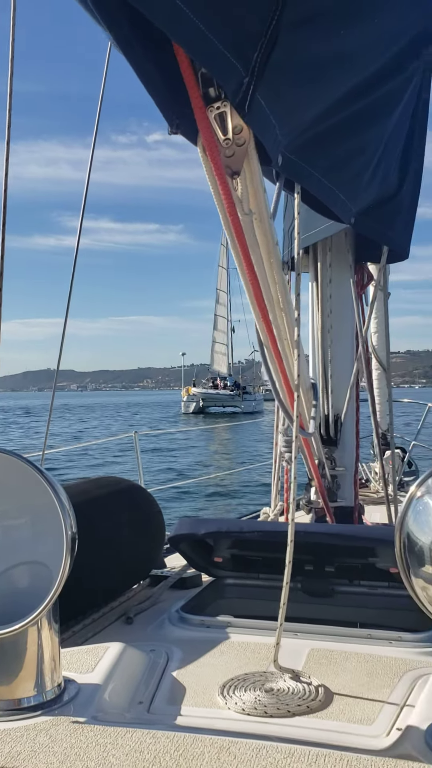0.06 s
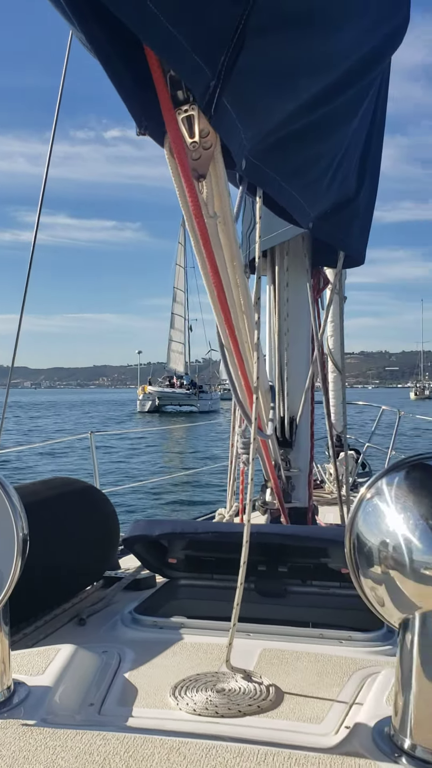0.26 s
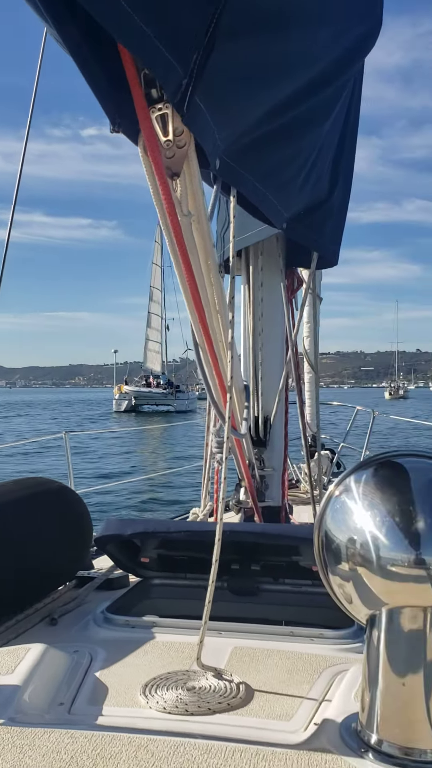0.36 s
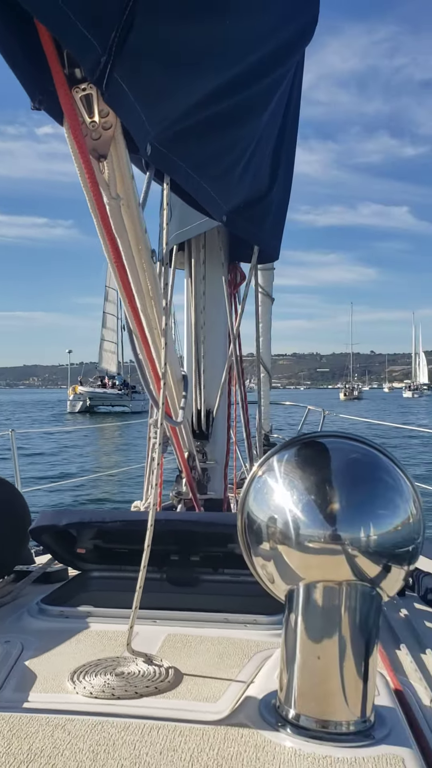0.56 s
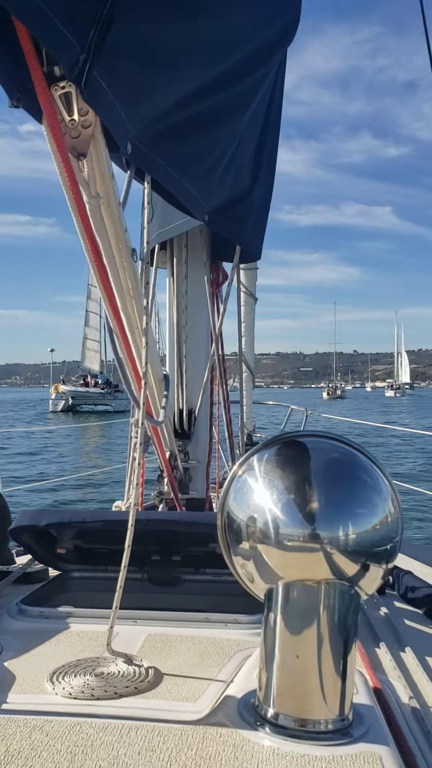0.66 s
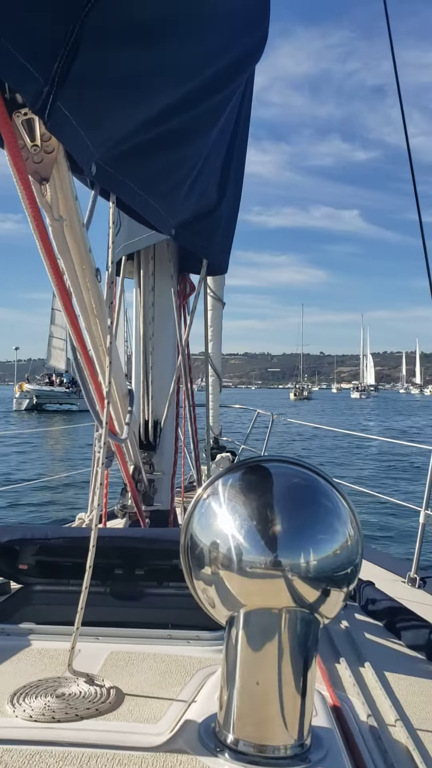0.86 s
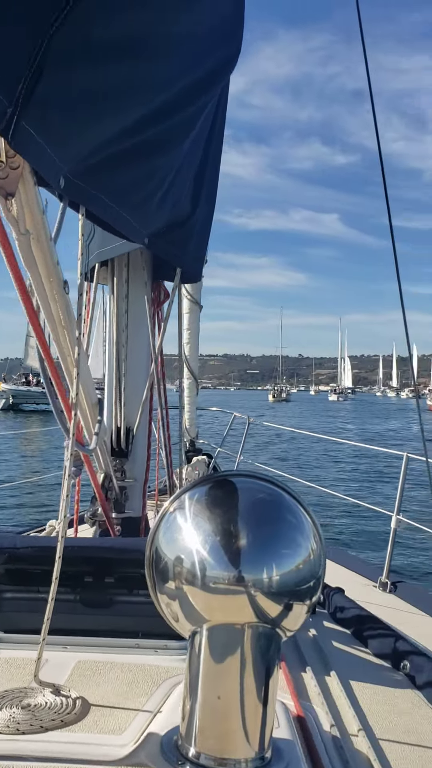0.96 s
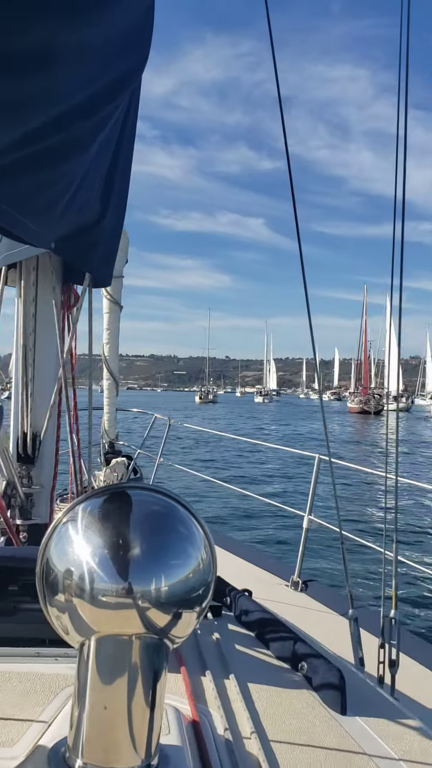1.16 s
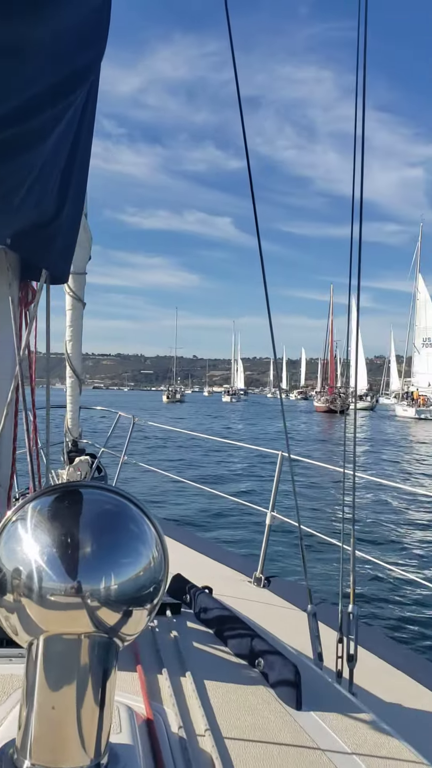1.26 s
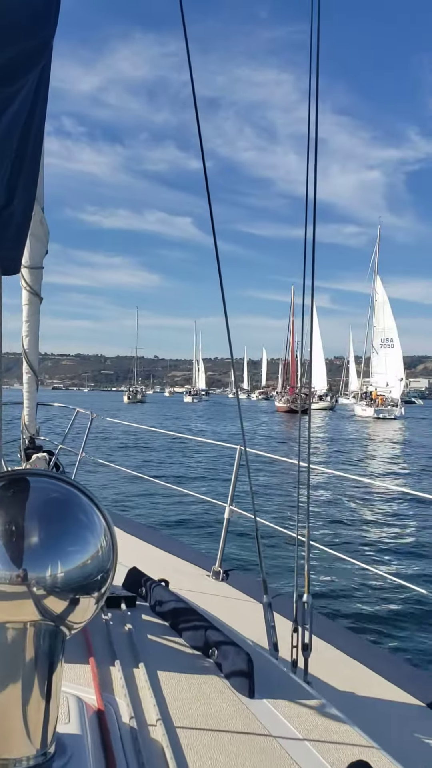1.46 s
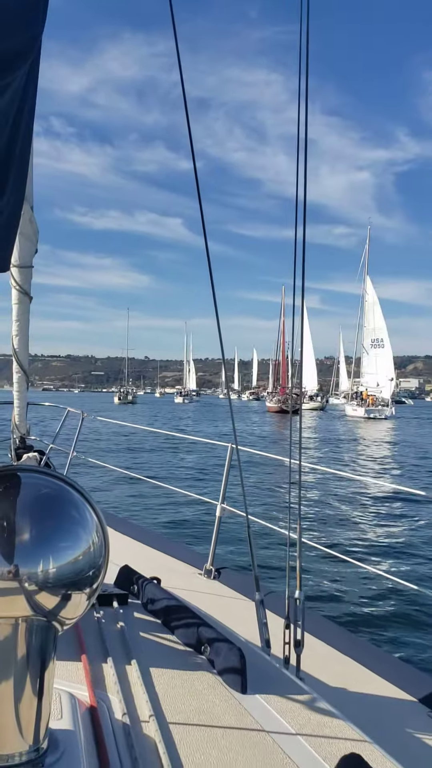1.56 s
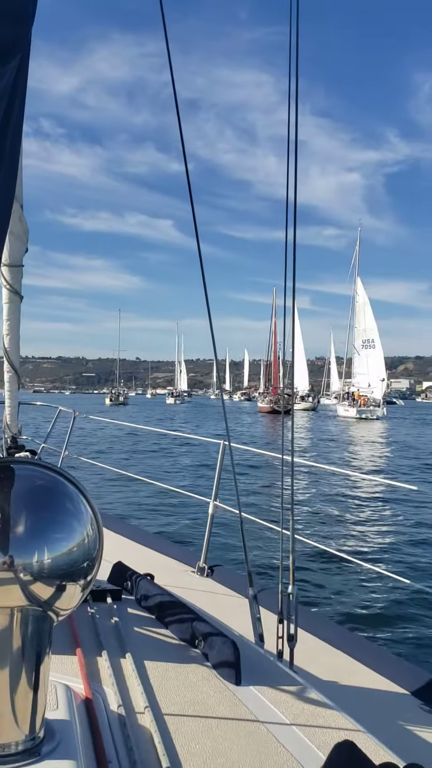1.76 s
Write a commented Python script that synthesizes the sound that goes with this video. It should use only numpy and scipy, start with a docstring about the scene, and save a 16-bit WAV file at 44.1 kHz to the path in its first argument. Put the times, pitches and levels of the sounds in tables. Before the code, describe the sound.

A close air horn swells into a single half-second blast and cuts off, leaving faint distant echoes. Around the microphone in the sailboat's cockpit, a slow engine, wind and water rumble, with a thin rising whine.

```python
"""Cockpit of a sailboat motoring across a bay, stereo microphone: one blast of an air horn close by.
The horn arrives directly and off the deck; as the microphone turns, those paths shift and its
overtones swell and fade. Faint echoes return from far off. Underneath: a slow engine with throbbing
hiss, water on the hull, a thin rising whine, two tiny squeaks. The blast pulls the gain control
down, and it only creeps back."""
import sys
import numpy as np
from scipy import signal
from scipy.io import wavfile
from scipy.ndimage import map_coordinates

SR = 44100
rng = np.random.default_rng(int(sys.argv[2]) if len(sys.argv) > 2 else 0)


def unload_audio(sound):
    """Save the sound as a 16-bit wav file, at the path given as the first command line argument."""
    columns = np.transpose(np.atleast_2d(sound))
    # keep every value between -1 and 1, then stretch to whole-number steps
    steps = np.round(np.clip(columns, -1, 1) * 32767)
    wavfile.write(sys.argv[1], SR, steps.astype(np.int16))


N = 79380
T = np.arange(N) / SR
EARS = np.array([[1], [-1]])   # left up, right down
HORN_DB, VALVE_SHUTS_S = 14.5, .649

# air behind the horn's diaphragm: t/s, level/dB re full blow
BLOW = [(.197, -58), (.213, -29), (.228, -12), (.24, -8.5), (.268, -8.5), (.303, -2.5), (.35, -.8),
        (.41, 0), (.5, -.5), (.645, -1.8)]


def from_db(db):
    """Decibels to gain."""
    return 10 ** (np.asarray(db) / 20)


def rms_one(x):
    """Scale to rms 1."""
    return x / np.sqrt(np.mean(x ** 2) + 1e-20)


def in_time(rows):
    """The columns of a curve, sample by sample."""
    s, *columns = np.transpose(rows)
    return [np.interp(T, s, c) for c in columns]


def at_hz(points, hz):
    """Read a table on a log-frequency axis."""
    freqs, values = np.transpose(points)
    return np.interp(np.log(hz), np.log(freqs), values)


def smooth(x, seconds):
    """One-pole lag."""
    r = np.exp(-1 / (seconds * SR))
    return signal.lfilter([1 - r], [1, -r], x)


def phase_of(hz):
    """Running phase of a pitch curve."""
    return 2 * np.pi * np.cumsum(hz) / SR


def delayed(x, ms):
    """Read a sound late by a steady or sliding delay."""
    return map_coordinates(x, [(T - ms / 1000) * SR], order=3)


def drift(rate_hz):
    """Random wander of rms about 1, mostly slower than rate_hz."""
    step, settle = 40, 2000
    r = np.exp(-2 * np.pi * step * rate_hz / SR)
    white = rng.standard_normal(N // step + settle + 2)
    slow = signal.lfilter([1], [1, -2 * r, r * r], white)[settle:]
    return np.interp(np.arange(N) / step, np.arange(len(slow)), rms_one(slow))


def banded_noise(spectrum, flicker_db):
    """Stereo noise of rms 1 in half-octave bands, each with its own flicker, width and balance."""
    # likeness of the two channels: f/Hz, correlation
    likeness = [(180, .99), (550, .82), (1650, .35), (5000, .1)]
    # lean to the left: f/Hz, left minus right/dB
    balance = [(400, 1.7), (1300, 0), (4400, 0), (8100, 8), (14000, 2)]
    out, edges = 0, 22 * 2 ** np.arange(0, 9.6, .5)
    white = rng.standard_normal((2, 2, N + SR // 4))
    for k, (low, high) in enumerate(zip(edges, edges[1:])):
        if high < spectrum[0][0] or low > spectrum[-1][0]:
            continue
        band = signal.butter(2, [low, high], "band", fs=SR, output="sos")
        mid, side = signal.sosfilt(band, white[k % 2])[:, -N:]
        hz = np.sqrt(low * high)
        alike = at_hz(likeness, hz)
        gain = from_db(at_hz(spectrum, hz) + flicker_db * drift(20) + EARS * at_hz(balance, hz) / 2)
        out = out + gain * (np.sqrt(1 + alike) * mid + np.sqrt(1 - alike) * side * EARS)
    return rms_one(out)


def water():
    """Steady rumble all round the cockpit, with soft knocks of waves on the hull."""
    # rumble of engine, wind and water: f/Hz, relative density/dB
    rumble = [(22, -20.5), (42, -2.5), (70, 1.5), (115, -2), (150, -6), (280, -10), (500, -16.5),
              (1000, -17), (2500, -34.5)]
    # waves knocking on the hull: t/s, f/Hz, level/dB
    knocks = [(1.157, 112.5, -11.5), (1.48, 81, -14)]
    rise_s, t60_s = .0096, .17
    out = from_db(-31.5) * banded_noise(rumble, flicker_db=1)
    for s, hz, db in knocks:
        age = np.maximum(T - s, 0)
        envelope = (1 - np.exp(-age / rise_s)) * from_db(-60 * age / t60_s)
        out = out + from_db(db) * envelope * np.sin(2 * np.pi * hz * age)
    return out


def engine():
    """The boat's engine: low hum lines, and hiss that swells once per cycle."""
    # hum lines: multiple of the cycle rate, level/dB
    hum_lines = [(4, -50), (8, -47), (10, -42), (16, -43), (32, -52), (40, -50)]
    # engine hiss: f/Hz, relative density/dB
    hiss_spectrum = [(400, -5), (1200, 5), (2200, 3), (3600, -1), (5000, -5.5), (7500, -8), (9000, -19.5),
                     (11500, -28), (13000, -40), (16000, -46)]
    cycle_hz, throb_at_s, throb_db = 10.35, .075, 2.8
    phase = phase_of(cycle_hz + .04 * drift(3)) - 2 * np.pi * cycle_hz * throb_at_s
    hum = 0
    for k, db in hum_lines:
        level = from_db(db + 1.4 * drift(1.7))
        hum = hum + level * np.sqrt(2) * np.sin(k * phase + rng.uniform(0, 2 * np.pi))
    hiss_db = -41.5 + throb_db * np.cos(phase) + .67 * drift(40)
    return hum + from_db(hiss_db) * banded_noise(hiss_spectrum, flicker_db=1)


def whine():
    """A thin wavering tone that climbs steadily, dead centre."""
    # course of the whine: t/s, f/Hz, level/dB
    climb = [(0, 1105, -39.5), (.08, 1148, -42), (.13, 1180, -52), (.24, 1228, -49), (.42, 1290, -47.5),
             (.75, 1342, -45), (1.25, 1432, -57.5), (1.56, 1473, -49), (1.8, 1545, -64.5)]
    hz, db = in_time(climb)
    return from_db(db + 2.2 * drift(8)) * np.sqrt(2) * np.sin(phase_of(hz + 3 * drift(30)))


def squeaks():
    """Brief, very high two-tone squeaks, left of the microphone."""
    # squeaks: t/s, length/s, level/dB
    events = [(0.911, .06, -53), (1.055, .025, -64.5)]
    # their two tones: f/Hz
    pitches = [14100, 14400]
    gates = sum(from_db(db) * ((T > s) & (T < s + length)) for s, length, db in events)
    tones = sum(np.sin(phase_of(hz + 50 * drift(150))) for hz in pitches)
    return smooth(gates, seconds=.0045) * tones * from_db([[0], [-8]])


def bay(x):
    """The horn from a distance: a faint wash over the water and a few smeared echoes."""
    # echoes off other boats and the shore: delay/s, level/dB
    echoes = [(.24, -34), (.46, -46), (.68, -48)]
    wash_db, t60_s, smear_s = -35.5, .91, .02
    decay = from_db(-60 * T / t60_s) ** 2
    power = from_db(wash_db) ** 2 * decay / decay.sum()
    for delay, db in echoes:
        smear = np.exp(-((T - delay) / smear_s) ** 2)
        power = power + from_db(db) ** 2 * smear / smear.sum()
    response = np.sqrt(power) * rng.standard_normal((2, N))
    # the horn beams its overtones farther than its fundamental
    beamed = signal.sosfilt(signal.butter(1, 2300, "high", fs=SR, output="sos"), x)
    return signal.fftconvolve(beamed[None], response, axes=1)[:, :N]


def deck(left, right):
    """The direct sound plus close reflections whose delays slide as the microphone turns."""
    # paths off deck and cabin, per channel: gain, delay at mid blast/ms, slide/(ms per s)
    left_paths = [(.21, .309, -1.204), (.48, .44, .015), (.236, 1.725, .842), (.366, 2.285, -.092),
                  (.211, 2.961, -.175)]
    right_paths = [(.439, 1.502, -.569), (.559, 5.317, -.168), (.374, 9.061, -1.023), (.503, 8.789, .193),
                   (.296, .689, -.136)]
    from_mid_blast = T - .45
    left, right = [x + sum(gain * delayed(x, ms + slide * from_mid_blast) for gain, ms, slide in paths)
                   for x, paths in [(left, left_paths), (right, right_paths)]]
    return np.array([left, delayed(right, ms=.09)])


def escaping_air():
    """Air hisses out of the horn while the valve is open, and spits as it shuts."""
    # escaping air: f/Hz, relative density/dB
    spectrum = [(500, -6), (2500, -8), (6000, -2), (10000, -19.5), (16000, -34)]
    blow_db, = in_time(BLOW)
    flow = from_db(blow_db - 66) * (T < VALVE_SHUTS_S)
    puff = from_db(-45) * np.exp(-((T - VALVE_SHUTS_S) / .0033) ** 2)
    return from_db(HORN_DB) * smooth(flow + puff, seconds=.005) * banded_noise(spectrum, flicker_db=1)


def horn():
    """The diaphragm buzzes louder and brighter with more air; when the valve shuts the bell rings out."""
    # pitch, sharp as the diaphragm starts: t/s, f/Hz
    pitch = [(.21, 714), (.232, 724), (.26, 718), (.295, 717), (.34, 714), (.385, 712), (.47, 713),
             (.6, 714), (.648, 714), (.654, 719), (.68, 715)]
    # overtones at full blow: harmonic number, relative level/dB
    overtones = [(1, -12.5), (2, -12), (3, -25), (4, -23), (5, -27.5), (6, -41), (7, -38), (8, -47.5),
                 (9, -47.5), (10, -60.5), (11, -55), (12, -68), (15, -66.5), (18, -73), (22, -70)]
    waver_hz, flutter_hz, ring_t60_s = .074, .58, .18
    tilt_db_per_octave, shimmer_db_per_khz = .82, .35
    dulling = .67   # dB lost per octave for each dB less blow, up to harmonic 4
    (blow_db,), (hz,) = in_time(BLOW), in_time(pitch)
    phase = phase_of(hz + waver_hz * drift(23) + flutter_hz * drift(130))
    since_shut = np.maximum(T - VALVE_SHUTS_S, 0)
    tone = 0
    for k in range(1, 23):
        db = at_hz(overtones, k) + blow_db * (1 + dulling * np.log2(min(k, 4)))
        tilt_db = tilt_db_per_octave * np.log2(k) * EARS   # brighter on the left
        shimmer_db = shimmer_db_per_khz * k * hz / 1000 * np.array([drift(3), drift(3)])
        ring = from_db(-60 * since_shut * k ** .67 / ring_t60_s)   # high overtones die first
        level = from_db(db + tilt_db + shimmer_db) * ring
        tone = tone + level * np.sin(k * phase + rng.uniform(0, 2 * np.pi))
    return from_db(HORN_DB) * np.sqrt(2) * tone


def scene():
    """At the microphone: the horn, near and far, over the sounds of the boat."""
    left, right = horn()
    blast = deck(left, right) + bay(left)
    boat_left, boat_right = engine() + water()
    boat = np.array([delayed(boat_left, ms=.32), boat_right])
    return blast + escaping_air() + boat + whine() + squeaks()


def record(dry):
    """The recorder's gain control ducks quickly under the blast and recovers slowly; the top is cut."""
    threshold_db, attack_s, release_db_per_s, cutoff_hz = -10.5, .022, 1.86, 15900
    power = smooth(np.mean(dry ** 2, axis=0), seconds=.0025)
    over_db = np.maximum(10 * np.log10(power + 1e-12) - threshold_db, 0)
    recovery_db = release_db_per_s * T
    held_db = np.maximum.accumulate(over_db - recovery_db) + recovery_db
    ducked = dry * from_db(-smooth(held_db, attack_s))
    return signal.sosfilt(signal.ellip(10, .1, 80, cutoff_hz, fs=SR, output="sos"), ducked)


dry = scene()
out = record(dry)
unload_audio(out)
```